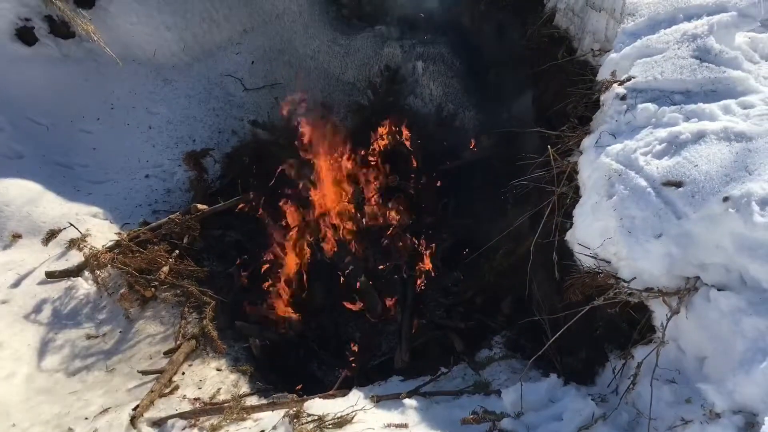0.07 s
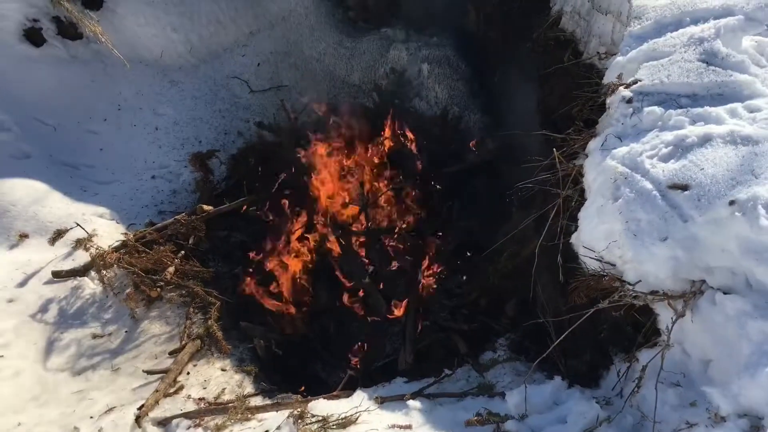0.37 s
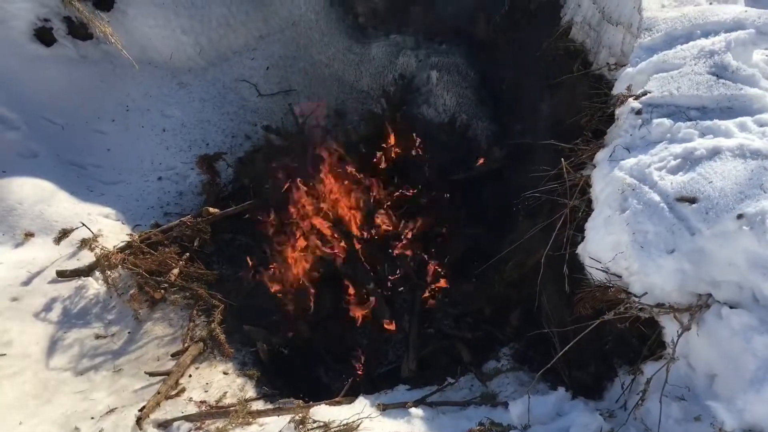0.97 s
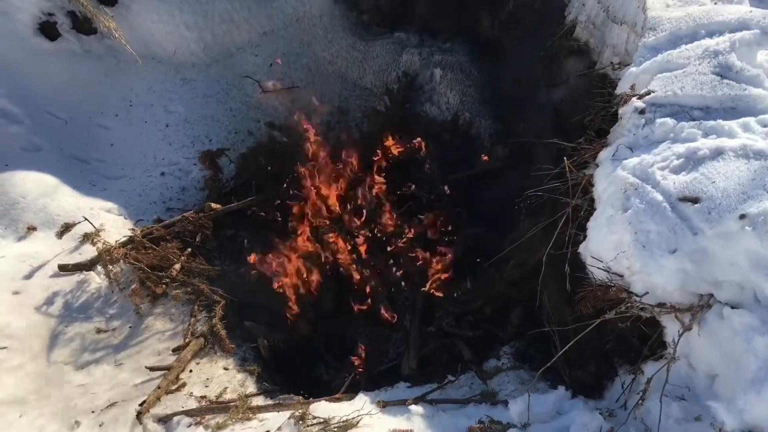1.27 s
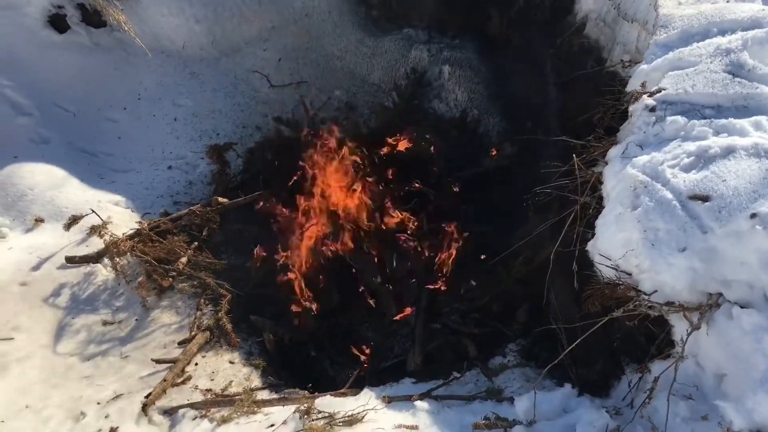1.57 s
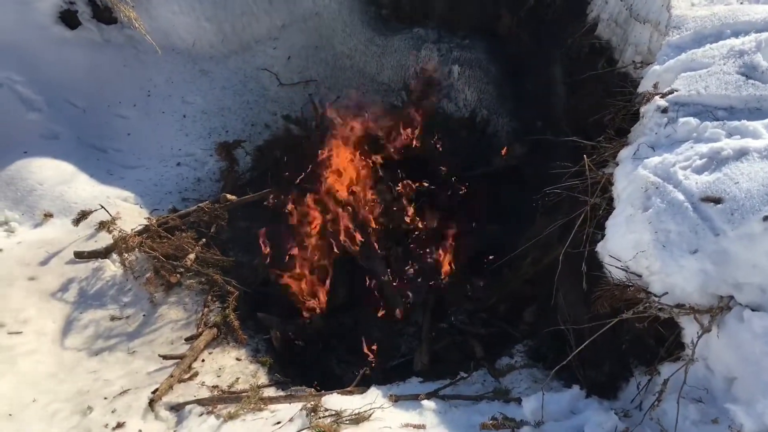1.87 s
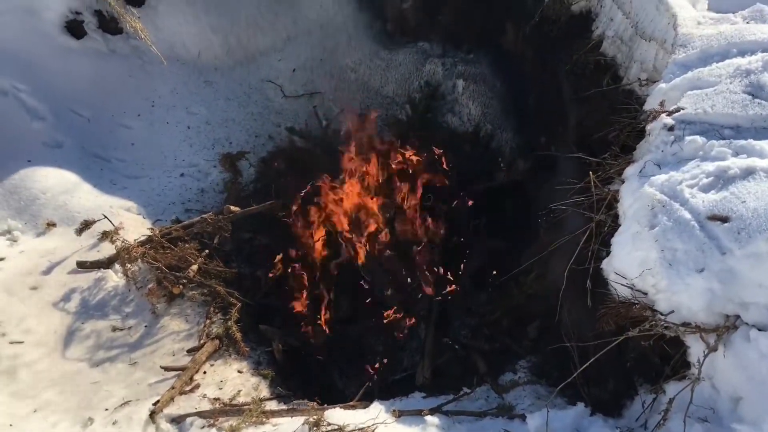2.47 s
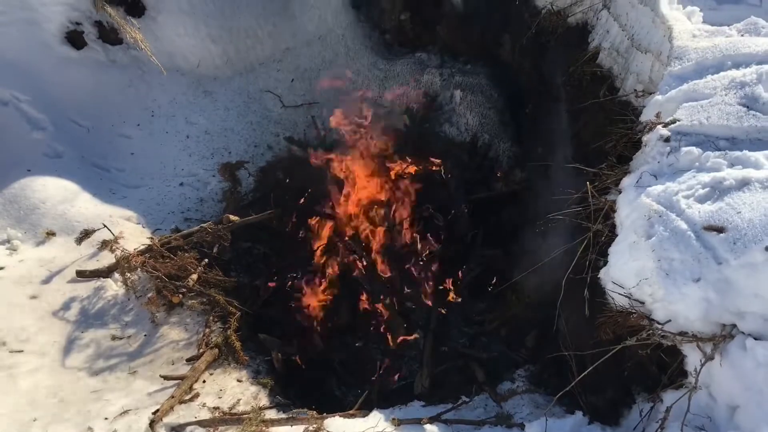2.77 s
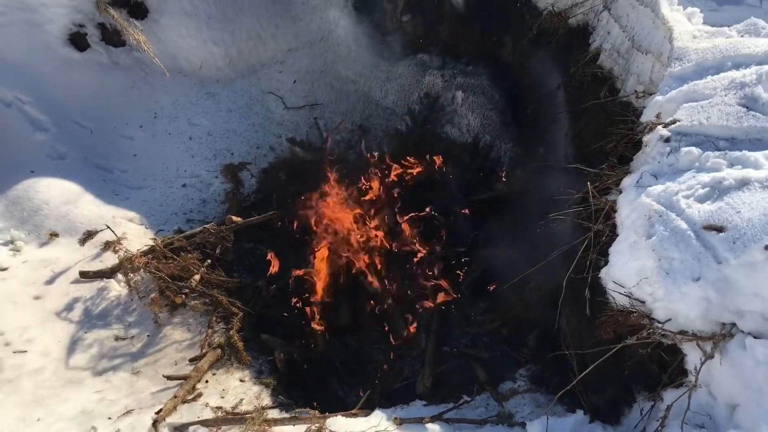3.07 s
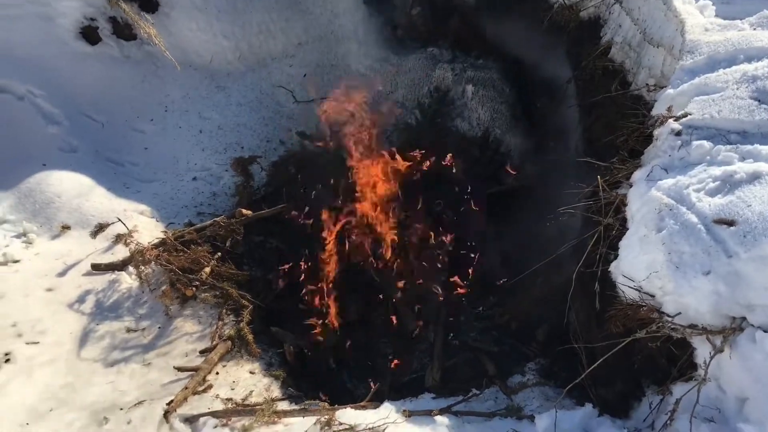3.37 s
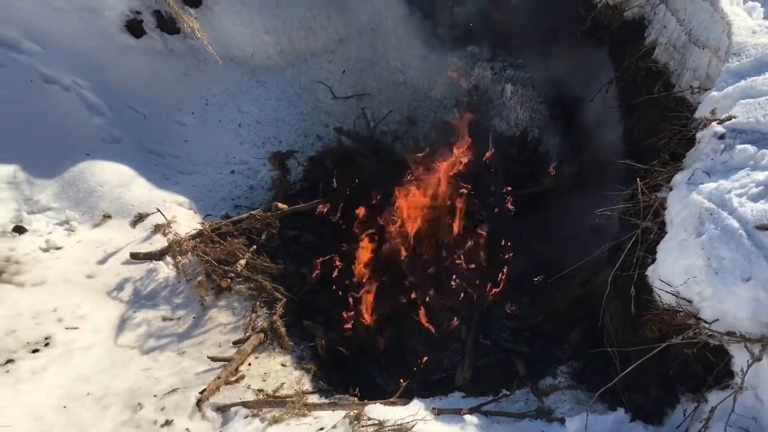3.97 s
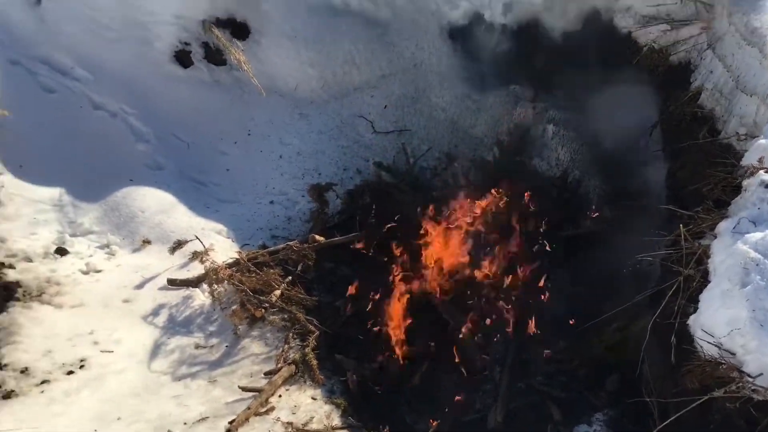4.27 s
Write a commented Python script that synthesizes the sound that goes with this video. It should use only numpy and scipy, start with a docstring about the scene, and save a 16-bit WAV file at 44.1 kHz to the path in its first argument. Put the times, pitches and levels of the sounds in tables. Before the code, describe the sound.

A pile of limbs and brush burns in an open pit in the snow, heard from a couple of metres away. Sharp, dry pops come irregularly, many each second, with the two loudest cracks near the middle. Fine twig crackle, sizzling sap and faint steam hiss fill the gaps. Underneath, the flames flutter with a soft roar and a few low thumps. There is no echo.

```python
"""Sharp pops from a pile of limbs and brush burning in an open pit in the snow, a couple of metres away.
Pockets of steam burst the wood, and the twigs and pit walls scatter each pop briefly.
Small twigs crackle, boiling sap sizzles and steam hisses from wet limbs in the gaps.
Underneath, the flames flutter over a soft roar and jets of gas catch fire with low thumps."""
import sys
import numpy as np
from scipy import signal
from scipy.fft import rfft, irfft
from scipy.io import wavfile
from scipy.ndimage import uniform_filter1d

SR = 44100
rng = np.random.default_rng(int(sys.argv[2]) if len(sys.argv) > 2 else 0)


def transcribe(signal):
    """Save signal, clipped to [-1, 1], as a 16-bit WAV file at the path in sys.argv[1]."""
    frames = np.atleast_2d(signal).T
    limited = np.clip(frames, -1, 1)
    pcm = np.round(limited * 32767).astype(np.int16)
    wavfile.write(sys.argv[1], SR, pcm)


N = 194745

# Steam pops; knock, snap and tail relative to the mid band: start_s, level_db, knock_db, snap_db, tail_db
POP_EVENTS = [(0.0179, -32.5, -5, 1.5, -18), (0.1046, -34, -9, -2, -8), (0.1394, -26, -9, 6, -5.5),
              (0.2113, -26, -9, -4.5, -5), (0.2223, -29.5, -16, 1, -21), (0.253, -25, -4.5, 3.5, -18),
              (0.3082, -26, -11.5, 9, -31), (0.3557, -29.5, -8, 0, -6), (0.3623, -22.5, -15, 11, -27),
              (0.3852, -34, -6, -3, -25), (0.4361, -24.5, -8.5, 4.5, -6), (0.4994, -23, -15, 2.5, -17),
              (0.5588, -21.5, -7, -9.5, -18.5), (0.628, -26, -8.5, -8.5, -50), (0.7693, -30.5, -5, 5, -3.5),
              (0.907, -23, -13, -3.5, -31), (0.9512, -32.5, -4, -9, -29), (0.9985, -27.5, -6.5, -0.5, -21),
              (1.0409, -28.5, -12, 3, -15), (1.0971, -25.5, -0.5, -12, -28), (1.1005, -27.5, -12, -2, -30),
              (1.2332, -32, -3.5, -0.5, -22), (1.3448, -26.5, -5, 6, -40), (1.37, -28.5, 6.5, 5, -28),
              (1.4003, -35, -3, 4.5, -6), (1.4646, -29, -7, 7.5, 2.5), (1.4921, -30.5, -2, 0.5, -6.5),
              (1.5381, -32.5, -1.5, 3.5, -4), (1.5986, -31.5, -2, -2, -6),
              (1.6493, -17.5, -5.5, -7.5, -12.5), (1.6778, -29, -2, 6.5, -13), (1.7094, -23, -9, 4, -14),
              (1.795, -32.5, -8.5, -9, -7), (1.8606, -8.5, -14.5, 2.5, -39), (1.8675, -15, -10.5, -4, -7.5),
              (1.9171, -34, -2.5, 2, -22), (1.9746, -30, -10, -1.5, -4), (2.0577, -34.5, -29, 3, -10),
              (2.0976, -30.5, -26, -1.5, -28), (2.139, -31.5, -7, 4, -4), (2.202, -33.5, 0, 14, 8),
              (2.2579, -30.5, -7, 9, -25), (2.2883, -35.5, -3, 13, -1), (2.3069, -32.5, -8, 5, -17),
              (2.4238, -32.5, -16, -2, -19), (2.481, -17.5, -7.5, -0.5, -17), (2.5577, -32.5, -8, 1.5, 4),
              (2.6073, -25.5, -9.5, -9, -10), (2.6109, -12.5, -14.5, 8.5, -16), (2.7028, -39, -8, 2, -0.5),
              (2.8159, -31.5, -10, -5, -35), (2.962, -23, -2.5, -3, -5.5), (3.0443, -33.5, -11, -0.5, 1.5),
              (3.0868, -31, -28, 18, 0), (3.1747, -33, -26, 7, 0), (3.2041, -26, -2, -4, -16),
              (3.2923, -30.5, -3, 0.5, -11), (3.3225, -27, -9.5, -22, -12), (3.3326, -18.5, -0.5, -11, -26),
              (3.3686, -34, 0.5, 3, 6), (3.7814, -31.5, -27, -16, -38), (3.8045, -37, 1, -2, -36),
              (3.8772, -19.5, -5.5, -33, -15), (4.0505, -35.5, -32, -1, -17), (4.064, -33.5, -30, -1, -25),
              (4.2564, -27.5, -26, 11, -12), (4.261, -22.5, 0, -22, -19)]


def pops():
    """Steam pockets burst the limbs in loud pops."""
    return wood_bursts(POP_EVENTS, tear_t60_s=0.0074, crack=3.6, tail_t60_s=0.06)


# Spectrum of splitting wood: freq_hz, gain_db
WOOD_SPECTRUM = [(200, -8.5), (480, -15.5), (650, -7), (820, -7), (1700, -0.5), (6300, 6.5), (9500, 3.5),
                 (15000, -5)]


def wood_bursts(rows, tear_t60_s, crack, tail_t60_s, scatter_hz=13700.0, size=2560):
    """Wood splits: a crack, tearing fibres, then splinters and scatter from twigs and pit walls."""
    start_s, level_db, knock_db, snap_db, tail_db = np.transpose(rows)[..., None]
    t = np.arange(size) / SR
    fibres, scatter, lumps = np.swapaxes(rng.standard_normal((len(rows), 3, size)), 0, 1)
    tear = fibres * undb(-60 * t / tear_t60_s)
    tear[:, 3] += crack * np.sign(tear[:, 3])
    tear = colour(tear, WOOD_SPECTRUM, size=512)
    scatter = scatter * undb(7.5 * lumps[:, np.arange(size) // 40])  # separate ticks of about 1 ms
    scatter = colour(scatter, WOOD_SPECTRUM, size=512)
    tail_envelope = undb(tail_db - 60 * t / tail_t60_s) * (1 - np.exp(-t / 0.0018))
    attack = t < .002
    bursts = 0
    for band, band_db in zip(wood_bands(), (knock_db, 0, snap_db)):
        direct = signal.sosfilt(band, tear)
        direct = direct / direct[:, attack].std(axis=1, keepdims=True)
        tail = unit(signal.sosfilt(band, scatter))
        tail = lowpass(tail, scatter_hz)  # ash and snow soak up the treble
        bursts = bursts + undb(band_db) * (direct + tail_envelope * tail)
    bands_rms = np.sqrt(1 + undb(knock_db) ** 2 + undb(snap_db) ** 2)
    bursts = bursts * undb(level_db) / bands_rms
    out = np.zeros(N)
    for at_s, burst in zip(start_s[:, 0], bursts):
        add(out, at_s, burst)
    return out


def wood_bands(knock_hz=2200, snap_hz=7000):
    """Low, mid and high filters: thick limbs knock, thin twigs snap."""
    knock = [(knock_hz, "low")]
    mid = [(knock_hz, "high"), (snap_hz, "low")]
    snap = [(snap_hz, "high")]
    return [np.vstack([signal.butter(2, hz, kind, fs=SR, output="sos") for hz, kind in edges] * 2)
            for edges in (knock, mid, snap)]


# How briskly the fine brush burns, for crackles and sizzle: time_s, level_db
BRUSH_BURN = [(0.0, -56.5), (0.3, -57.5), (0.57, -49), (0.69, -52), (0.96, -52), (1.5, -49.5), (1.8, -53.5),
              (1.89, -49), (1.98, -69), (2.07, -48), (2.49, -58), (2.58, -44.5), (2.88, -63), (3.0, -53.5),
              (3.45, -53.5), (3.87, -48), (4.14, -58), (4.41, -49)]


def crackles(count=140, boost_db=16.5, depth_loss_db=13.0, mean_gap_s=0.0055):
    """Twigs split in three quick, weakening steps; those deep in the pile are fainter, more scattered."""
    jitter, depth = rng.random((count, 2)).T
    thick, thin = rng.standard_normal((count, 2)).T
    onset = ((np.arange(count) + jitter) * N / count).astype(int)
    start_s = onset / SR
    level_db = curve(BRUSH_BURN)[onset] + boost_db - depth_loss_db * depth
    knock_db, snap_db, tail_db = -6 + 5 * thick, 1.5 + 3 * thin, -31 + 6 * depth
    splits = []
    for _ in range(3):
        splits.append(np.column_stack([start_s, level_db, knock_db, snap_db, tail_db]))
        start_s = start_s + rng.exponential(mean_gap_s, count)
        level_db = level_db - 8 * rng.random(count)
    return wood_bursts(np.vstack(splits), tear_t60_s=0.013, crack=4.7, tail_t60_s=0.034)


def sizzle(ticks_per_s=400, decay_s=0.0005, gain_db=-9.5, hiss_db=-12.5, cutoff_hz=10300.0):
    """Sap boils out of the wood in tiny ticks over a faint hiss."""
    ticks = (rng.random(N) < ticks_per_s / SR) * rng.exponential(size=N) ** 2
    energy = signal.lfilter([1], [1, -np.exp(-1 / (decay_s * SR))], ticks)
    grains = unit(np.sqrt(energy) * rng.standard_normal(N))
    hiss = undb(hiss_db) * rng.standard_normal(N)
    sap = lowpass(colour(grains + hiss, WOOD_SPECTRUM), cutoff_hz)
    return unit(sap) * undb(curve(BRUSH_BURN) + gain_db)


# Gas ignitions: start_s, pitch_hz, level_db
GAS_PUFFS = [(0.106, 73.4, -32), (0.629, 177, -37.5), (0.847, 64, -37.5), (1.752, 62, -36.5),
             (3.702, 92, -34.5), (3.839, 63, -32.5), (4.165, 66.6, -36), (4.392, 67.6, -39)]


def gas_puffs(cycles=1.1):
    """Jets of gas catch fire, each pushing the air for a cycle or two: a soft thump."""
    out = np.zeros(N)
    t = np.arange(SR // 10) / SR
    for start_s, pitch_hz, level_db in GAS_PUFFS:
        envelope = undb(level_db) * np.exp(-(pitch_hz * t / cycles) ** 2)
        add(out, start_s, envelope * np.sin(2 * np.pi * pitch_hz * t))
    return out


# Spectrum of the flames' flutter: freq_hz, gain_db
FLUTTER_SPECTRUM = [(20, -41), (38, -6.5), (58, 0), (90, -8.5), (140, -17.5), (2000, -104.5)]
# Spectrum of the flames' roar: freq_hz, gain_db
ROAR_SPECTRUM = [(70, -6.5), (180, 2.5), (450, -13), (900, -17.5), (2200, -24), (12000, -30.5)]


def flames(flutter_db=-52, roar_db=-55.0, lick_db=1.5, flare_db=7, flare_s=0.07, big_puff_hz=84.5):
    """Flames flap over a soft roar, harder around big, low puffs; both swell as tongues of fire lick up."""
    t = np.arange(N) / SR
    flare = sum(min(big_puff_hz / pitch_hz, 1) ** 2 * np.exp(-((t - start_s) / flare_s) ** 2)
                for start_s, pitch_hz, _ in GAS_PUFFS)
    flutter = unit(colour(rng.standard_normal(N), FLUTTER_SPECTRUM)) * undb(flutter_db + flare_db * flare)
    roar = unit(colour(rng.standard_normal(N), ROAR_SPECTRUM)) * undb(roar_db)
    return (flutter + roar) * undb(lick_db * wander(rate_hz=20))


# Steam leaving wet limbs: start_s, length_s, centre_hz, level_db
STEAM_JETS = [(0.695, 0.3, 3300, -61.5), (2.905, 0.39, 3460, -67), (2.95, 0.3, 4800, -63)]


def steam_jets(q=1.6):
    """Steam hisses through a split in the wood, swelling and dying away."""
    out = np.zeros(N)
    for start_s, length_s, centre_hz, level_db in STEAM_JETS:
        swell = signal.windows.tukey(int(length_s * SR))
        hiss = signal.lfilter(*signal.iirpeak(centre_hz, q, fs=SR), rng.standard_normal(N))
        add(out, start_s, undb(level_db) * swell * unit(hiss)[:len(swell)])
    return out


def undb(db):
    """Decibels to gain."""
    return 10 ** (np.asarray(db) / 20)


def unit(x):
    """Scale to rms 1."""
    return x / np.sqrt(np.mean(x ** 2))


def curve(rows):
    """Join (time_s, value) rows by straight lines."""
    return np.interp(np.arange(N) / SR, *np.transpose(rows))


def add(out, start_s, x):
    """Mix x into out from start_s on."""
    i = int(np.clip(start_s * SR, 0, N - 1))
    out[i:i + len(x)] += x[:N - i]


def colour(x, points, size=4096):
    """Minimum-phase filter through (freq_hz, gain_db) points, along the last axis."""
    freq_hz, gain_db = np.transpose(points)
    bins_hz = np.maximum(np.arange(size // 2 + 1) * SR / size, 1)
    gain = undb(np.interp(np.log(bins_hz), np.log(freq_hz), gain_db))
    cepstrum = irfft(np.log(gain))
    cepstrum[1:size // 2] *= 2
    cepstrum[size // 2 + 1:] = 0
    response = np.array(irfft(np.exp(rfft(cepstrum))), ndmin=x.ndim)
    return signal.fftconvolve(x, response, axes=-1)[..., :x.shape[-1]]


def lowpass(x, cutoff_hz):
    """First-order low-pass."""
    return signal.lfilter(*signal.butter(1, cutoff_hz, fs=SR), x)


def wander(rate_hz):
    """Slewed random steps, rms 1."""
    hold = max(int(SR / rate_hz), 1)
    steps = np.repeat(rng.standard_normal(N // hold + 1), hold)
    return unit(uniform_filter1d(steps, hold)[:N])


def scene():
    """Burning wood over the flames, in mono; the snow returns no echo."""
    return (pops() + crackles() + sizzle() + steam_jets() + flames() + gas_puffs())[None]


# Microphone port response: freq_hz, gain_db
MIC_PORT = [(1800, 0.5), (2500, -2), (4000, 1.5), (4900, -0.5), (5500, 0.5), (9500, 0.5), (10400, -2.5),
            (11200, 2.5)]


def record(dry, ceiling=0.9, cutoff_hz=15600):
    """The microphone port colours the sound, the loudest crack is rounded off and the top is cut."""
    rounded = ceiling * np.tanh(colour(dry[0], MIC_PORT) / ceiling)
    top_cut = signal.ellip(8, .2, 70, cutoff_hz, fs=SR, output="sos")
    return signal.sosfilt(top_cut, rounded)[None]


dry = scene()
out = record(dry)
transcribe(out)
```